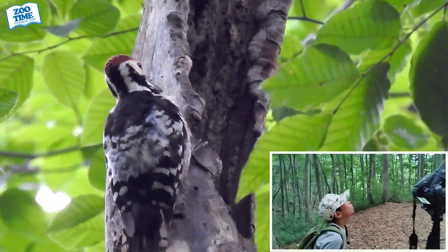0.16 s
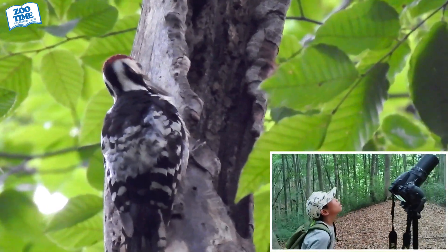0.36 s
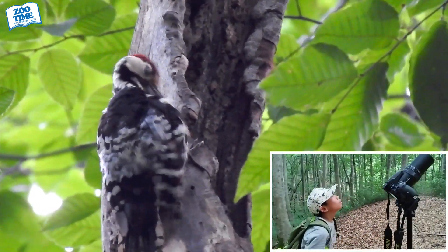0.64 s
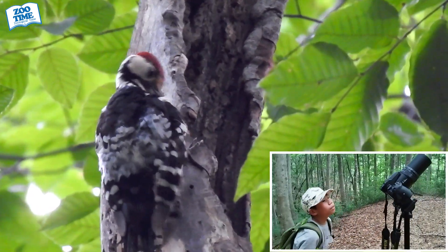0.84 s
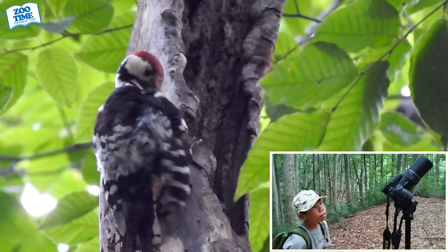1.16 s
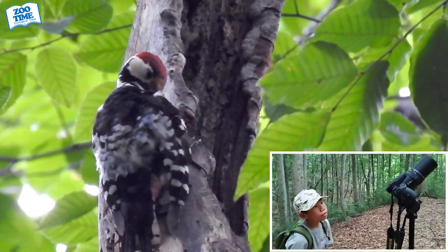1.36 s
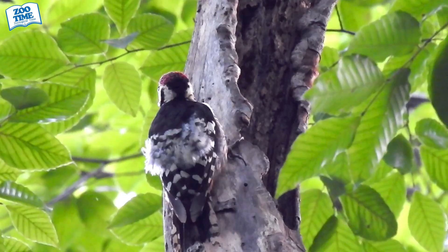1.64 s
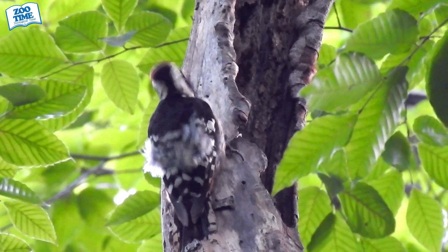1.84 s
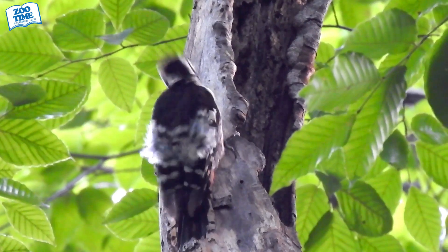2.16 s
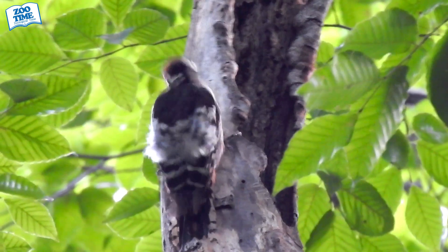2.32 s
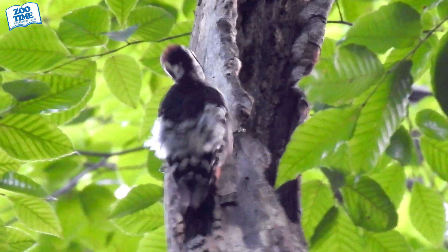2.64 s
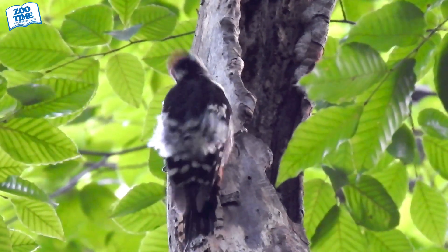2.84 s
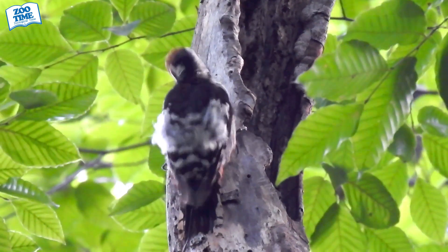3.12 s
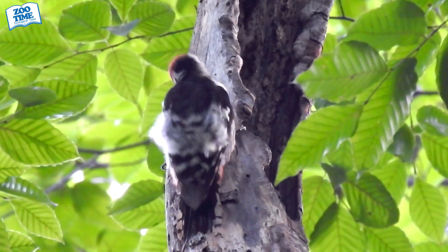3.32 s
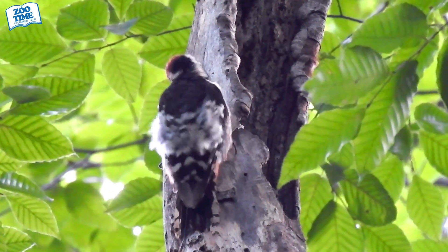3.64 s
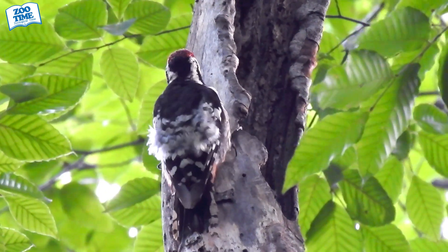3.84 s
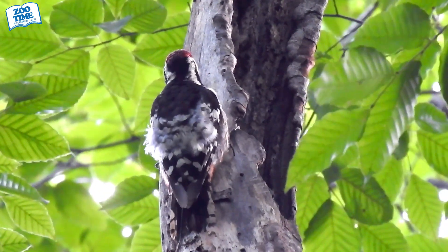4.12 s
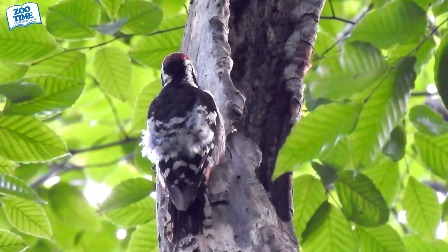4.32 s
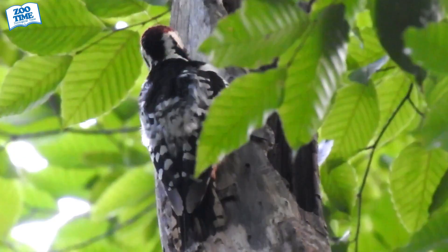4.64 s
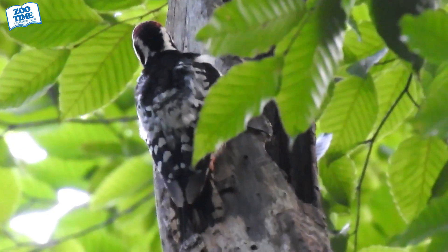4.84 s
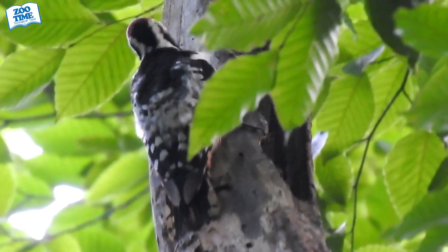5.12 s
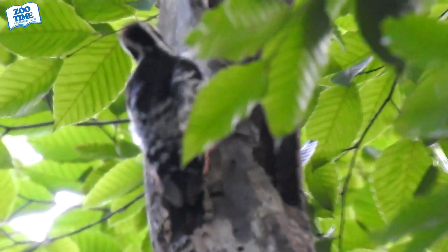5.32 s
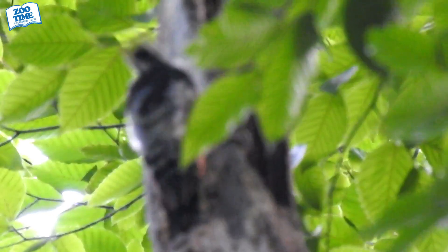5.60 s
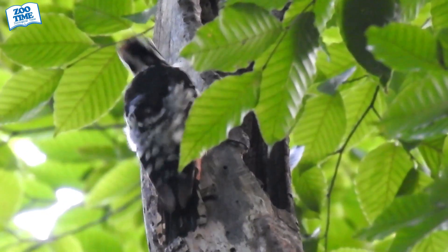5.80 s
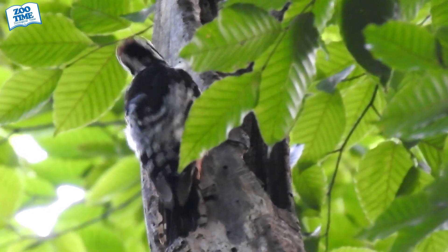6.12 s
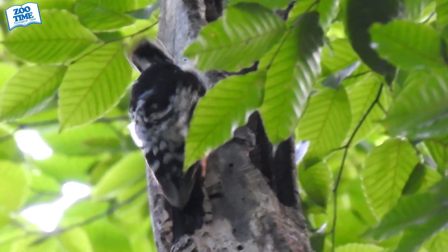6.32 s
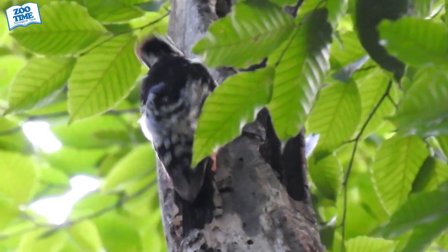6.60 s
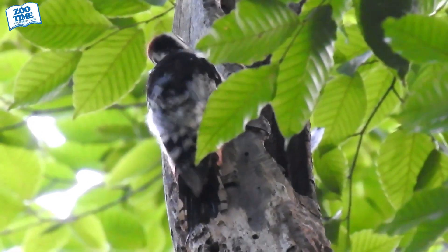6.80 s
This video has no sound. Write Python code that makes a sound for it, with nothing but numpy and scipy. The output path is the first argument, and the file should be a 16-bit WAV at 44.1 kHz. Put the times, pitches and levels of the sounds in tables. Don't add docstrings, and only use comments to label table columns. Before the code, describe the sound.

Quiet woodland opens with faint high insect shimmer, leaf hiss and tiny twig snaps. At an abrupt cut, a loud steady cicada chorus arrives, a near buzz fading over it. A woodpecker drums a quickening roll on a dead trunk, tailing off. Another cut brings denser cicadas, scuffs and bumps close by, then a louder roll, ending in a short fade. Stereo, outdoors, microphone below the tree.

```python
import sys
import numpy as np
from scipy import signal
from scipy.fft import rfft, irfft, next_fast_len
from scipy.io import wavfile
from scipy.ndimage import uniform_filter1d, map_coordinates

SR = 44100
rng = np.random.default_rng(int(sys.argv[2]) if len(sys.argv) > 2 else 0)


def pcm_store(signal):
    levels = np.round(np.clip(np.atleast_2d(signal), -1, 1) * 32767)
    wavfile.write(sys.argv[1], SR, levels.astype(np.int16).T)


def natural_amplitude(level_db):
    exponent = np.asarray(level_db, float) / 20
    return 10 ** exponent


N = 306803

VIEW_EDGES = [0, 1.6318, 4.672, 7]


def unit(x):
    return x / np.sqrt(np.mean(x ** 2) + 1e-20)


def along(points, hz):
    f, v = np.transpose(points)
    return np.interp(np.log(hz + 1), np.log(f + 1), v)


def curves(*tables):
    s, *cols = np.transpose(np.vstack(tables))
    return [np.interp(np.arange(N) / SR, s, c) for c in cols]


def across(ends):
    lines = []
    for start, end, (first, last) in zip(VIEW_EDGES, VIEW_EDGES[1:], ends):
        lines.append([(start, first), (end - 1 / SR, last)])
    return curves(*lines)[0]


def between(start, end):
    t = np.arange(N) / SR
    return np.clip(np.minimum(t - start, end - t) / .0005 + .5, 0, 1)


def wobble(rate):
    knots = rng.standard_normal(int(N * rate / SR) + 4)
    return map_coordinates(knots, [np.arange(N) * rate / SR])


def filtered(x, response):
    m = next_fast_len(N + SR // 2)
    return irfft(rfft(x, m) * response(np.fft.rfftfreq(m, 1 / SR)), m)[..., :N]


def resonance(f, hz, width, db):
    return natural_amplitude(db) * 1j * f * width / (hz * hz - f * f + 1j * f * width)


# start_s, first_gap_s, gap_shrink_s_per_peck, bend_s_per_peck_squared, shortest_gap_s
ROLL_TIMING = [
    (2.0525, .09754, .002443, .000004, .0501),
    (5.3818, .10009, .00283, -.000019, .0509),
]
PECK_COUNTS = [25, 22]
# full_db, first_peck_weaker_db, last_peck_weaker_db, tiring_lateness
EFFORT = [
    (0, 3, 15, 3.05),
    (0.6, 1, 10, 3.9),
]


def pecks(timing, count, effort):
    warm_up_pecks, scatter_db = 0.42, 0.52
    start, gap, shrink, bend, shortest = timing
    full_db, first_db, last_db, tiring = effort
    k = np.arange(count)
    gaps = np.maximum(gap - shrink * k - bend * k * k, shortest)
    warming_db = first_db * np.exp(-k / warm_up_pecks)
    tiring_db = last_db * (k / (count - 1)) ** tiring
    db = full_db - warming_db - tiring_db + scatter_db * rng.standard_normal(count)
    return np.c_[start + np.cumsum(gaps) - gaps, db]


# frequency_hz, t60_s
FOREST_DECAY = [(300, 0.21), (1000, 0.21), (3000, 0.13)]


def forest_tail():
    hz, t, z = signal.stft(rng.standard_normal((2, SR // 3)), SR, nperseg=256)
    z[1] = 0.96 * z[0] + 0.23 * z[1]
    decay = natural_amplitude(-60 * t / along(FOREST_DECAY, hz)[:, None])
    build_up = 1 - np.exp(-t / 0.005)
    tail = signal.istft(z * decay * build_up, SR, nperseg=256)[1]
    return np.pad(tail / np.linalg.norm(tail[0]), ((0, 0), (300, 0)))


# pitch_hz, width_hz, level_db
TRUNK_MODES = [
    [(533, 95, 2), (860, 99, 4.5), (1101.3, 200, 2.5), (1540, 245, 2.5), (1730, 49, 2.5), (2233, 53, -5),
     (2890, 105, 4), (3500, 290, 4)],
    [(552, 93, -3.5), (810, 97, 1), (1078, 165, 3.5), (1465, 224, -1.5), (1574, 280, 1.5), (1663, 65, -2),
     (2242, 19, 0), (2790, 410, -8.5)],
]
# delay_s, level_db
ECHOES = [
    (.00625, -7),
    (0.0115, -25.5),
    (0.0163, -14),
]


def roll(blows, modes, late_db):
    firm, soft = np.zeros(N), np.zeros(N)
    for s, db in blows:
        share = np.clip(0.91 + db / 14, 0, 1)
        i = round((s + .0029) * SR)
        firm[i] = -natural_amplitude(db + 26.0) * share
        soft[i] = -natural_amplitude(db + 29.0) * (1 - share)

    def contact(hz):
        return lambda f: np.exp(-(f / hz) ** 2)

    def wood(f):
        thin = 1j * f / (340 + 1j * f)
        hollow = resonance(f, hz=353.2, width=39, db=1) ** 2
        return thin * (sum(resonance(f, *m) for m in modes) + hollow)

    force = filtered(firm, contact(hz=1987)) + filtered(soft, contact(hz=1190))
    bill_click = filtered(firm, lambda f: resonance(f, hz=4140, width=910, db=-30.5))
    knock = filtered(force, wood) + bill_click
    early = filtered(knock, lambda f: 1 + sum(natural_amplitude(db) * np.exp(-2j * np.pi * f * s) for s, db in ECHOES))
    ahead = filtered(knock, lambda f: np.exp(2j * np.pi * f * 0.00492 - (f / 900) ** 2))
    late = signal.fftconvolve(knock[None], forest_tail(), axes=1)[:, :N]
    stirred = 1 + 0.19 * np.array([wobble(40), wobble(40)])
    return natural_amplitude([[.6], [-.6]]) * (early + natural_amplitude(-6.0) * ahead) + natural_amplitude(late_db) * late * stirred


def buzz(rate_hz, orders, gains, blur_hz, glide=1):
    turns = 2 * np.pi * rate_hz * np.cumsum(glide * (1 + .002 * wobble(5))) / SR
    out = 0
    for k, g in zip(orders, gains):
        shared = wobble(blur_hz)
        ears = []
        for _ in "LR":
            in_step = (shared + 0.6 * wobble(blur_hz)) * np.sin(k * turns)
            ears.append(in_step + wobble(blur_hz) * np.cos(k * turns))
        out = out + g * np.array(ears)
    return unit(out)


# frequency_hz, level_db
CICADA_BODY = [(5000, -25), (5400, -16), (5900, -5), (6500, 4), (7000, 1.5), (7600, -2), (8400, -28),
               (9500, -59)]


def cicada(clicks_hz, shift_hz=0, blur_hz=70):
    orders = np.arange(10, 17)
    gains = natural_amplitude(along(CICADA_BODY, orders * clicks_hz - shift_hz))
    return buzz(clicks_hz, orders, gains, blur_hz)


def spell_db(start, opening_db, held_db, settle, stop, dies_db):
    t = np.arange(N) / SR
    settling = (opening_db - held_db) * np.exp(-np.abs(t - start) / settle)
    return held_db + settling - dies_db * np.maximum(t - stop, 0) + 0.68 * wobble(9)


# start_s, opening_db, held_db, settle_s, stop_s, dies_db_per_s
NEAR_SPELLS = [
    (1.632, -20.5, -32, 0.14, 2.5, 36),
    (4.672, -23, -24, .03, 5.33, 90),
]
# spell_index, clicks_hz, boost_db, body_shift_hz, blur_hz
NEAR_SINGERS = [
    (0, 526, -1.5, -700, 299.7),
    (0, 350, -21, -900, 299),
    (1, 540, 7, -2, 109.8),
    (1, 527, 6, 0, 110),
    (1, 500, 3.5, 310, 109.5),
]
# start_s, end_s, clicks_hz, level_db
STEADY_SINGERS = [
    (.9, 1.63, 536, -79),
    (3.9, 4.3, 710, -39),
    (5.533, 6.96, 560, -28),
    (8.8, 10, 509, -34.5),
]
DRONE_HZ = [2018, 2108, 2112]
# time_s, level_db
DRONE_LEVEL = [
    [(0, -52), (.42, -55), (.6, -65), (1.63, -79)],
    [(1.64, -49.5), (2.2, -35.5), (2.63, -40), (2.98, -41), (4.67, -51)],
    [(4.672, -58), (5.2, -56), (5.3, -44), (5.42, -46), (5.75, -52), (6.96, -60)],
]
# time_s, pitch_hz, level_db
DRONE_SLIDE = [
    (2.3, 4180, -57),
    (2.45, 4110, -43),
    (2.65, 3920, -45),
    (3, 3800, -51),
]


def soloists():
    out = 0
    for spell, clicks_hz, boost_db, shift_hz, blur_hz in NEAR_SINGERS:
        level = natural_amplitude(spell_db(*NEAR_SPELLS[spell]) + boost_db)
        out = out + level * between(VIEW_EDGES[spell + 1], 7) * cicada(clicks_hz, shift_hz, blur_hz)
    for start, end, clicks_hz, db in STEADY_SINGERS:
        out = out + natural_amplitude(db) * between(start, end) * cicada(clicks_hz)
    for k, hz in enumerate(DRONE_HZ):
        drone = buzz(hz, [1, 2], natural_amplitude(np.array([-4, 0])), blur_hz=[60, 280, 260][k])
        level = natural_amplitude(curves(DRONE_LEVEL[k])[0] + 0.5)
        out = out + level * between(VIEW_EDGES[k], VIEW_EDGES[k + 1]) * drone
    slide_hz, slide_db = curves(DRONE_SLIDE)
    sliding = buzz(0.98, [1], [1], blur_hz=173.0, glide=slide_hz)
    out = out + natural_amplitude(slide_db) * between(2.3, 3) * sliding
    return out * natural_amplitude([[.7], [-.7]])


# time_s, peak_db, pitch_hz, t60_s
TRIPOD_BUMPS = [
    (0.001, -42, 300, .12),
    (1.287, -37, 61, 0.1),
    (1.347, -28, 32.2, 0.153),
    (4.195, -36, 211.7, 0.11),
    (5.252, -44, 875, .2),
    (5.259, -30.5, 203, 0.12),
    (5.314, -16, 196.3, 0.12),
    (5.316, -43, 870, .25),
    (5.692, -11, 173, 0.046),
]
# time_s, peak_db, pitch_hz
TWIG_SNAPS = [
    (0.095, -67, 1424),
    (0.262, -45, 994),
    (0.332, -42, 1260),
    (0.469, -45, 517),
    (0.634, -42, 470),
    (0.779, -47, 770),
    (1.059, -44.5, 460),
    (1.128, -47.5, 557),
]
# time_s, peak_db, lowest_hz, highest_hz
BARK_CHIPS = [
    (2.3042, -19, 4300, 5800),
    (2.6138, -33, 4280, 5600),
    (5.699, -27, 2000, 3600),
    (5.7094, -22, 4000, 6500),
    (6.672, -28, 3500, 5800),
]


def knocks():
    out, t = np.zeros(N + SR), np.arange(SR // 4) / SR

    def grit(band):
        sos = signal.butter(4, band, "band", fs=SR, output="sos")
        return signal.sosfilt(sos, rng.standard_normal(len(t))) * natural_amplitude(-60 * t / 0.023)

    for s, db, hz, t60 in TRIPOD_BUMPS:
        swell = 1 - np.exp(-t / 0.0153)
        out[round(s * SR):][:len(t)] += natural_amplitude(db + 9 - 60 * t / t60) * swell * np.sin(2 * np.pi * hz * t)
    for s, db, hz in TWIG_SNAPS:
        ring = natural_amplitude(-60 * t / 0.033) * np.sin(2 * np.pi * hz * t)
        out[round(s * SR):][:len(t)] += natural_amplitude(db - 0.5) * (ring + 1.3 * grit([200, 15000]))
    for s, db, low_hz, top_hz in BARK_CHIPS:
        out[round(s * SR):][:len(t)] += natural_amplitude(db + 11.5) * grit([low_hz, top_hz])
    return out[:N]


# frequency_hz, likeness
EAR_LIKENESS = [(40, 0.76), (200, 0.61), (1000, 0.774), (3000, 0.98), (7000, 0.25)]


def rush(spectrum, patchy_db, long=14):
    z = signal.stft(rng.standard_normal((2, N)), nperseg=1024)[2]
    field = uniform_filter1d(rng.standard_normal(z.shape[1:]), 4, 0)
    field = uniform_filter1d(field, int(long), 1)
    pair = signal.istft(z * natural_amplitude(patchy_db * unit(field)), nperseg=1024)[1][:, :N]

    def colour(hz):
        turn = np.arccos(np.clip(along(EAR_LIKENESS, hz), -1, 1)) / 2
        return natural_amplitude(along(spectrum, hz)) * [np.cos(turn), np.sin(turn)]

    mid, side = filtered(pair, colour)
    return unit(np.array([mid + side, mid - side]))


# time_s, level_db, half_length_s
SCUFFS = [
    (4.75, -50, .03),
    (4.83, -41, 0.032),
    (4.95, -52, 0.045),
    (5.045, -46, .04),
    (5.084, -41.5, 0.011),
    (5.271, -34.5, 0.015),
    (5.322, -32.5, 0.017),
    (5.366, -33.5, 0.02),
]
# frequency_hz, level_db_per_hz
LITTER_COLOUR = [(250, -33), (450, -8), (600, -2), (870, -1.5), (1100, -3.5), (1400, -15), (2500, -28)]


def rustle():
    t = np.arange(N) / SR
    shuffle = natural_amplitude(-58.5) * between(3.5, 5.4)
    strokes = shuffle + sum(natural_amplitude(db) * np.exp(-((t - s) / half) ** 2) for s, db, half in SCUFFS)
    linger_s, linger_db, dies_db_per_s = 3.5, -43.5, 24
    linger = natural_amplitude(linger_db - dies_db_per_s * np.abs(t - linger_s)) * between(linger_s, VIEW_EDGES[2])
    return (strokes * natural_amplitude(2.0 * wobble(45)) + linger) * rush(LITTER_COLOUR, patchy_db=5.5, long=3.8)


# frequency_hz, level_db_per_hz
CHORUS_COLOUR = [
    [(2710, -44), (4600, -46), (5450, -12.5), (5530, -6.5), (6000, -9), (6250, -2), (7310, -4), (8070, 5.5),
     (9130, 1.5), (9970, -5.5), (10700, -12.5), (13900, -42), (22000, -120)],
    [(2710, -34.5), (4600, -30), (5100, -31.5), (6000, -13), (6480, -6), (7840, -0.5), (8390, -3),
     (8840, -8), (10700, -40.5), (13900, -71), (22000, -120)],
    [(2710, -30.5), (4600, -27), (5370, -26), (6210, -6), (6620, -2), (7310, 1), (9130, -11.5),
     (10400, -30.5), (10700, -40), (13900, -68), (22000, -120)],
]
CHORUS_DB = [-43, -21, -19]
# frequency_hz, level_db_per_hz
LEAF_COLOUR = [
    [(150, -38), (250, -6.5), (835, -14.5), (1860, -13.5), (2030, -8), (2970, -14), (4090, -8),
     (4350, -13.5), (5200, -12.5), (6760, -48), (11400, -120)],
    [(150, -33), (250, -2.5), (1520, -6), (2080, -3), (2970, -10.5), (4140, -13), (5200, -12.5),
     (6760, -29), (11400, -120)],
    [(150, -26), (250, 1.5), (361, -0.5), (868, 1), (2940, -6.5), (4640, -24.5), (5200, -7.5), (6760, -30),
     (11400, -120)],
]
# start_db, end_db
LEAVES_DB = [
    (-59, -69.5),
    (-62.5, -64),
    (-53.5, -69),
]
# frequency_hz, level_db_per_hz
RUMBLE_COLOUR = [(12, -34), (20, 1), (113, 0.5), (173, -6), (203, -2.5), (242, -13), (400, -15),
                 (520, -36.5), (880, -120)]
# start_db, end_db
RUMBLE_DB = [
    (-48, -48.5),
    (-44, -44.5),
    (-37, -41),
]
# frequency_hz, level_db_per_hz
AIR_COLOUR = [(5000, -28), (9000, -4), (15700, 0.5), (15900, -120)]


def background(rolls):
    effort = [np.vstack([(r[0, 0], -60), r[1:], (r[-1, 0] + .05, -60)]) for r in rolls]
    wash_db = -43 + 1.46 * np.minimum(curves(*effort)[0], 0)
    leaves_db = np.maximum(across(LEAVES_DB), wash_db)
    lull_db = -12 * between(1.44, VIEW_EDGES[1])
    rumble_db = across(RUMBLE_DB) + lull_db
    out = natural_amplitude(rumble_db + 1.85 * wobble(10)) * rush(RUMBLE_COLOUR, patchy_db=2, long=6)
    chorus_boost_db, leaf_boost_db, leaf_flutter_db = [1, 2, 3], [9.8, 9.6, 9.6], [2.2, 0.96, 2.3]
    for k in range(3):
        chorus_db = CHORUS_DB[k] + chorus_boost_db[k] + 0.26 * wobble(11) + 0.3 * wobble(3.17)
        chorus = natural_amplitude(chorus_db) * rush(CHORUS_COLOUR[k], patchy_db=0.5)
        leaf_level = natural_amplitude(leaves_db + leaf_boost_db[k] + leaf_flutter_db[k] * wobble(15))
        leaves = leaf_level * rush(LEAF_COLOUR[k], patchy_db=2.0, long=2.8)
        out += between(VIEW_EDGES[k], VIEW_EDGES[k + 1]) * (chorus + leaves)
    first_view = between(0, VIEW_EDGES[1])
    air_db = -53.5 - 5.5 * np.arange(N) / SR + 1.8 * wobble(15)
    out += natural_amplitude(air_db) * first_view * rush(AIR_COLOUR, patchy_db=1, long=4.7)
    out[1] = np.where(first_view, np.roll(out[1], 5) * natural_amplitude(1.56), out[1])
    return out * natural_amplitude([[.5], [-.5]])


def scene():
    rolls = [pecks(*r) for r in zip(ROLL_TIMING, PECK_COUNTS, EFFORT)]
    drumming = sum(roll(*r) for r in zip(rolls, TRUNK_MODES, (-6, -8)))
    return drumming + background(rolls) + soloists() + knocks() + rustle()


# time_s, depth_db, recovery_s
GAIN_DIPS = [
    (5.495, 10.5, 0.035),
    (6.112, 3, 0.21),
]


def camera_gain():
    t = np.arange(N) / SR
    dips = 0
    for s, db, recovery in GAIN_DIPS:
        since = np.abs(t - s)
        dips = dips + db * (t > s) * (1 - np.exp(-since / 0.015)) * np.exp(-since / recovery)
    fade_start_s, fade_db_per_s = 6.66, 12
    return natural_amplitude(-dips - fade_db_per_s * np.maximum(t - fade_start_s, 0))


def masked(x, quiet_db, below_db):
    z = signal.stft(x, SR, nperseg=2048)[2]
    power = (np.abs(z[:, :1024]) ** 2).reshape(2, 128, 8, -1).mean(axis=2)
    jitter = natural_amplitude(9 * uniform_filter1d(rng.standard_normal(power.shape[1:]), 3, 0))
    loudest = power[:, 14:].max(axis=1, keepdims=True)
    keep = power * jitter > np.maximum(natural_amplitude(2 * quiet_db), loudest * natural_amplitude(2 * below_db))
    keep[:, :12] = True
    z[:, :1024] *= np.repeat(keep, 8, axis=1)
    return signal.istft(z, SR, nperseg=2048)[1][:, :N]


def roll_off(x):
    return signal.sosfilt(signal.butter(12, 15800, fs=SR, output="sos"), x)


def record(dry):
    low_cut = filtered(dry, lambda f: (1j * f / (35 + 1j * f)) ** 2)
    clipped = np.clip(low_cut * camera_gain(), -1, 1)
    mix = masked(clipped, quiet_db=-81.5, below_db=-40.5)
    return roll_off(mix)


dry = scene()
out = record(dry)
pcm_store(out)
```